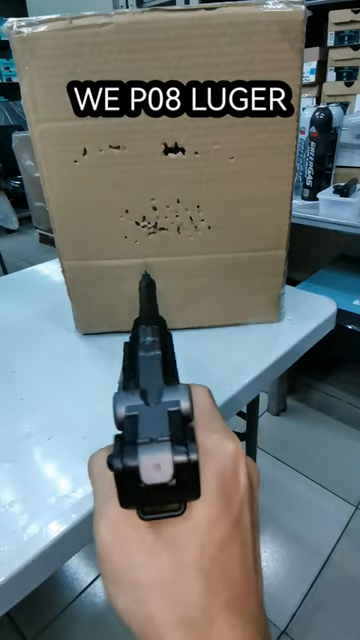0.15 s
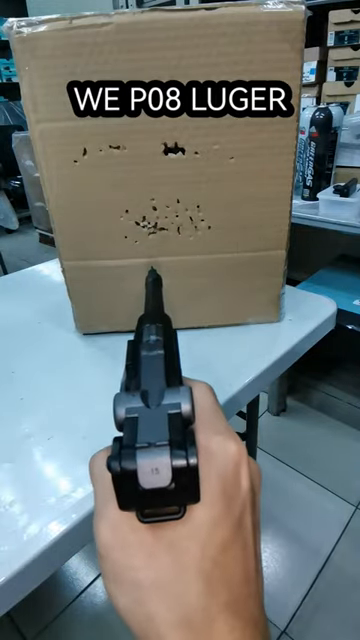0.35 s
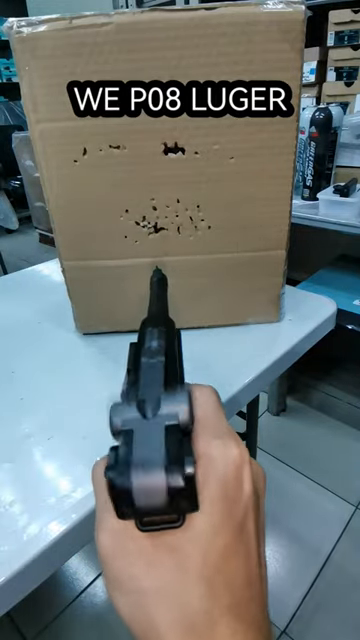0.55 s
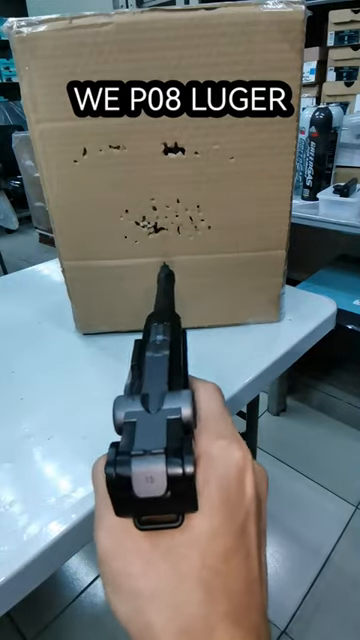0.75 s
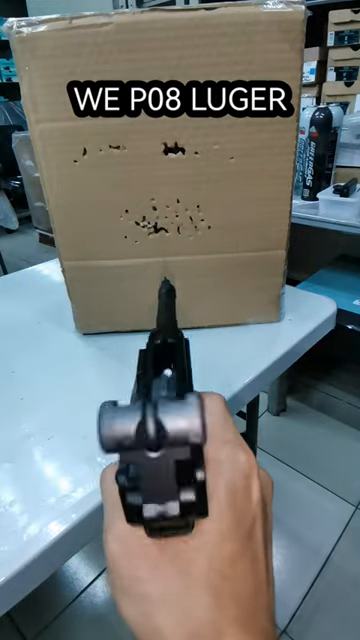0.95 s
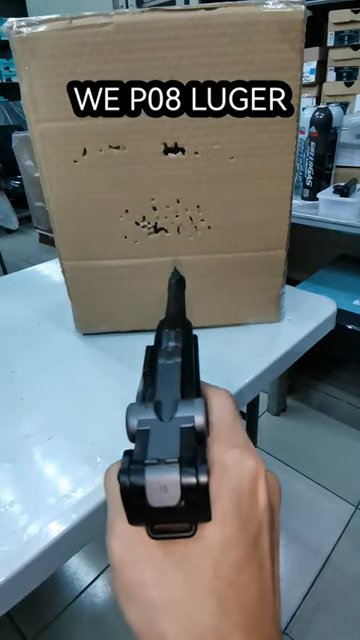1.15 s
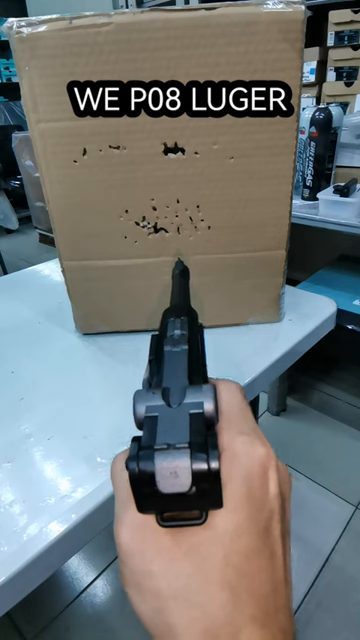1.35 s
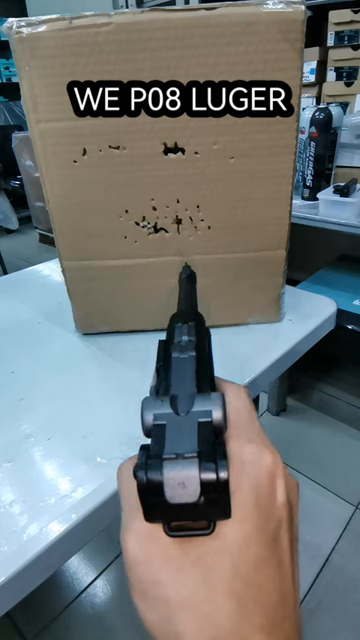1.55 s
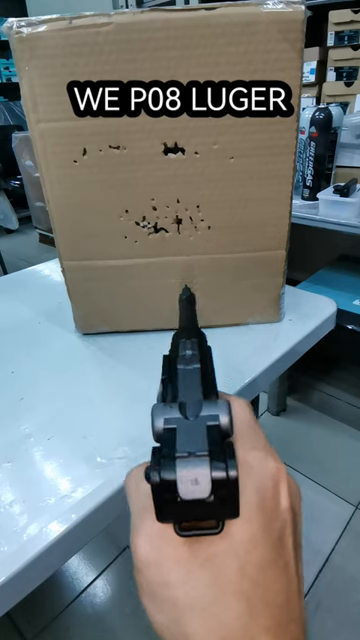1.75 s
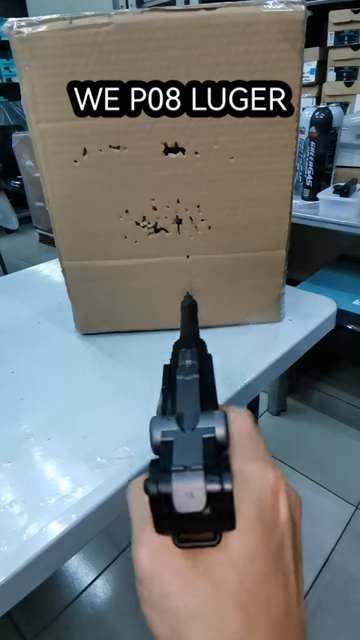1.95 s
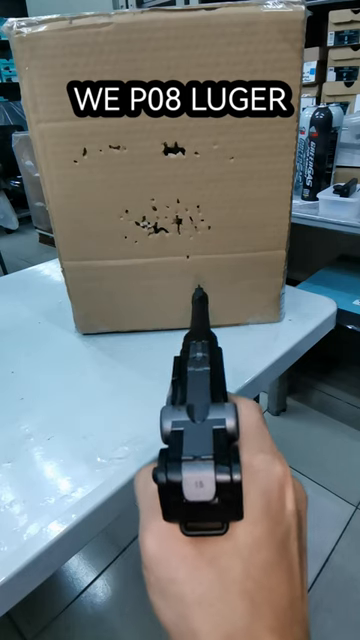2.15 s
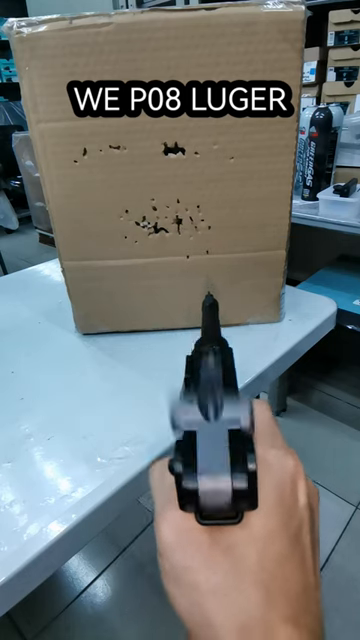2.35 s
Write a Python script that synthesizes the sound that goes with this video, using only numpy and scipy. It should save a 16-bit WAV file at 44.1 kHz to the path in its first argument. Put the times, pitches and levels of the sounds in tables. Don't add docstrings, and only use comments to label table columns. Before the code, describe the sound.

A gas airsoft pistol fires five sharp shots at about 0.2, 0.65, 1.1, 1.5 and 2.0 seconds. Each is a rattling gas crack with ringing steel, a boxy punch through cardboard 15 milliseconds later, then a metal snap shut about 65 milliseconds after the crack. Tiny trigger ticks precede later shots; faint pellet bounces follow the first two. Hard shop echoes; close stereo phone, low ventilation hum ducking and creeping back.

```python
import sys
import numpy as np
from scipy import signal
from scipy.fft import rfft, irfft
from scipy.io import wavfile
from scipy.ndimage import uniform_filter1d

SR = 44100
rng = np.random.default_rng(int(sys.argv[2]) if len(sys.argv) > 2 else 0)


def master(y):
    cut = np.clip(np.atleast_2d(y).T, -1, 1)
    pcm = np.round(cut * 32767)
    wavfile.write(sys.argv[1], SR, pcm.astype(np.int16))


def linear_from_db(decibels):
    return 10 ** (np.asarray(decibels, float) / 20)


N = 103635
PORT_LAG_S = .00014
KNOCK_T60_S, KNOCK_TURNS = 0.011, 3.8

# [t/s, peak level/dB, steel ring f/Hz, left-right/dB]
SHOTS = [
    (0.207, -12, 4410, 2),
    (0.657, -12.5, 5290, 1.5),
    (1.085, -12.5, 5070, 2.5),
    (1.527, -11.5, 5125, 3),
    (2.023, -14, 5040, 2.5),
]
# [f/Hz, level/dB]
BURST_COLOUR = [(60, -11.5), (250, -7.5), (600, 0), (1500, -3.5), (3500, -3), (4900, 2.5), (6650, -3.5),
                (9400, -8.5), (13000, -7.5), (16000, -21.5)]
# [f/Hz, left-right/dB]
PORT_BALANCE = [(60, -2.5), (290, 3), (640, -1.5), (2500, -2.5), (4800, -4.5), (7800, 5), (9400, 12.5),
                (11500, -2.5)]


def evened(x):
    return x / np.sqrt(np.mean(x ** 2) + 1e-20)


def read(points, hz):
    f, value = np.transpose(points)
    return np.interp(np.log(hz + 1), np.log(f + 1), value)


def add(mix, s, sound):
    part = mix[:, round(s * SR):][:, :sound.shape[1]]
    part += sound[:, :part.shape[1]]


def sides(pan_db):
    return np.array([[.5], [-.5]]) * pan_db


def tint(x, points):
    level_db = read(points, abs(np.fft.fftfreq(4096, 1 / SR)))
    log_gain = np.log(linear_from_db(np.maximum(level_db, -100)))
    taps = np.fft.ifft(np.exp(np.conj(signal.hilbert(log_gain)))).real[:2048]
    return signal.oaconvolve(x, taps[None], axes=1)[:, :x.shape[1]]


def ring(x, modes, scale):
    t = np.arange(4000) / SR
    taps = np.zeros((2, len(t)))
    for f, db, t60 in modes:
        turns = f * scale * t + rng.random((2, 1))
        taps += linear_from_db(db - 60 * t / t60) * np.sin(2 * np.pi * turns)
    return signal.oaconvolve(x, taps, axes=1)[:, :x.shape[1]]


def rattle(rise_s, hold_s, t60, spread_db, same):
    t = np.arange(0, .12, 1 / SR)
    fall = linear_from_db(-60 * np.maximum(t - rise_s - hold_s, 0) / t60)
    shape = np.minimum(t / rise_s, 1) ** 2 * fall
    lumps = linear_from_db(spread_db * evened(uniform_filter1d(rng.standard_normal(len(t)), size=30)))
    left, other = rng.standard_normal((len(t), 2)).T
    right = np.roll(same * left + np.sqrt(1 - same ** 2) * other, round(PORT_LAG_S * SR))
    return np.array([left, right]) * lumps * shape


def clank(drive, colour, ring_hz, ring_db, db, pan_db):
    # [multiple of the ring pitch, level/dB, t60/s]
    steel_modes = [(.46, -10, .03), (.63, -9, .03), (.76, -8, .03), (.92, -4, .025), (.98, 0, .028),
                   (1.04, -1, .025), (1.1, -5, .025)]
    ringing = evened(ring(drive, steel_modes, ring_hz))
    mixed = evened(tint(drive, colour)) + linear_from_db(ring_db) * ringing
    peak = np.sqrt(uniform_filter1d((mixed ** 2).mean(0), size=180).max())
    return mixed / peak * linear_from_db(db + sides(pan_db))


def shop():
    # [f/Hz, level/dB]
    hum_colour = [(30, 0), (70, -12), (140, -4), (300, -3.5), (2540, -4.5), (5500, -15.5), (9000, -31.5),
                  (15000, -31)]
    # [f/Hz, likeness]
    hum_likeness = [(60, 0.67), (380, 0.64), (2380, -0.19), (15000, 0.36)]
    frames, hz = N // 256 + 5, np.fft.rfftfreq(1024, 1 / SR)
    a, b, c, d, patches = rng.standard_normal((frames, 513, 5)).T
    patches = uniform_filter1d(patches, size=8, axis=0)
    patches = evened(uniform_filter1d(patches, size=8, axis=1))
    same = np.clip(read(hum_likeness, hz), -1, 1)[:, None]
    left = a + 1j * b
    right = same * left + np.sqrt(1 - same ** 2) * (c + 1j * d)
    z = np.array([left, right]) * linear_from_db(read(hum_colour, hz)[:, None] + 1.46 * patches)
    wash = signal.istft(z, nperseg=1024, noverlap=768)[1][:, :N]
    return linear_from_db(-52.5) * evened(wash)


def motors():
    # [f/Hz, level/dB]
    motor_lines = [(145.3, -74.5), (358, -93), (506, -81), (651.4, -79), (1394, -77)]
    out = np.zeros(N)
    for f, db in motor_lines:
        waver = evened(uniform_filter1d(rng.standard_normal((N, 2)), size=5000, axis=0)).T
        turns = np.cumsum(f + 1.26 * waver[1]) / SR
        out += linear_from_db(db + 9.0 + 2.0 * waver[0]) * np.sin(2 * np.pi * turns)
    return out


def ducking(depth_db, back_s):
    t, down_db = np.arange(N) / SR, np.zeros(N)
    for s, *_ in SHOTS:
        creep = np.exp(-np.maximum(t - s - .1, 0) / back_s)
        down_db = np.maximum(down_db, (t > s) * depth_db * creep)
    return linear_from_db(-uniform_filter1d(down_db, size=400))


def background():
    hum = shop()
    low = signal.sosfilt(signal.butter(2, 400, fs=SR, output="sos"), hum)
    ducked_low = low * (ducking(25.5, 0.21) + 0.14)
    ducked_high = (hum - low) * ducking(16.4, 0.29)
    return ducked_low + ducked_high + motors() * ducking(21.6, 0.16)


def gas_burst(db, ring_hz, pan_db):
    return clank(rattle(0.0024, 0.012, 0.069, 1.5, 0.083), BURST_COLOUR, ring_hz, -7.0, db - 7.0, pan_db)


def hammer_crack(db, ring_hz, pan_db):
    # [f/Hz, level/dB]
    crack_colour = [(100, -2), (500, -5.5), (1500, 1.5), (3000, 4.5), (4800, 1.5), (7000, -12),
                    (11500, -12), (16000, -51)]
    return clank(rattle(0.00055, 0.0045, 0.019, 1.14, 0.62), crack_colour, ring_hz, -4.0, db - 5., pan_db)


def knock(db, hz, pan_db, t60):
    rise_s = 0.00064
    t = np.arange(0, .08, 1 / SR) - np.array([[0], [PORT_LAG_S]])
    shape = np.clip(t / rise_s, 0, 1) ** 2 * linear_from_db(-60 * np.maximum(t - rise_s, 0) / t60)
    first = np.sin(2 * np.pi * (hz * t + rng.random()))
    second = np.sin(2 * np.pi * (hz * rng.uniform(0.869, 1.12) * t + rng.random((2, 1))))
    gain = linear_from_db(db + sides(pan_db - read(PORT_BALANCE, hz)))
    return gain * shape * (first + 0.83 * second)


def room(x, db):
    # [f/Hz, t60/s]
    room_decay = [(100, 0.46), (270, 0.16), (600, 0.33), (1400, 0.45), (3700, 0.48), (5000, 0.53),
                  (9400, 0.46), (13000, 0.44)]
    # [f/Hz, level/dB]
    echo_colour = [(80, -26), (262, -4), (680, -5.5), (2500, -5), (4000, -2), (4930, -0.5), (6000, -4),
                   (9400, -8), (13100, -9), (15500, -28)]
    taps = np.zeros((2, SR))
    at = np.arange(200, SR - 20, 20)
    at = at + rng.integers(0, 20, (2, len(at)))
    np.put_along_axis(taps, at, rng.choice([-1., 1.], at.shape), 1)
    hz, t, z = signal.stft(taps, SR, nperseg=256)
    dying = linear_from_db(-60 * t / read(room_decay, hz)[:, None])
    tail = signal.istft(z * dying, SR, nperseg=256)[1]
    tail = tint(tail, [(f, g - read(BURST_COLOUR, f)) for f, g in echo_colour])
    return linear_from_db(db) * signal.fftconvolve(x, tail / np.linalg.norm(tail[0]), axes=1)[:, :N]


def puff(db, hz):
    turns = np.arange(0, 5.2 / hz, 1 / SR) * hz
    shape = np.minimum(turns * 1.77, 1) * linear_from_db(-14. * turns)
    return linear_from_db(db) * np.array([[1.], [-.25]]) * np.sin(2 * np.pi * turns) * shape


def punch(db):
    # [f/Hz, level/dB, t60/s]
    panel_modes = [(272.4, -15.5, 0.18), (534.4, -7, 0.047), (928, -10, 0.012), (1200, -29, 0.0062)]
    t = np.arange(0, .2, 1 / SR)
    u, late = (t - .0005) / .0006, (t - .0017) / .0007
    pulse = np.where(u > 0, -np.exp(-u ** 2), .65 * t / .0005)
    pulse = pulse + .7 * (late > 0) * np.exp(-np.abs(late))
    panel = np.zeros(len(t))
    for f, g, t60 in panel_modes:
        panel -= linear_from_db(g - 60 * t / t60) * np.sin(2 * np.pi * f * rng.uniform(0.97, 1.015) * t)
    pulse = signal.lfilter(*signal.butter(1, 120, "high", fs=SR), uniform_filter1d(pulse, size=5))
    return linear_from_db(db - 5.5 + np.array([[-2.5], [1.5]])) * (pulse + linear_from_db(-8.0) * panel)


def toggle_slam(db, ring_hz):
    # [f/Hz, level/dB]
    slam_colour = [(100, -9.5), (516, -2.5), (873, -1.5), (4680, 0), (6500, -4.5), (7600, -6),
                   (12100, -10.5), (16000, -26)]
    return clank(rattle(0.0036, 0.0016, 0.089, 1.7, 0.3), slam_colour, ring_hz, -11.0, db + 7.0, 0)


def toggle_shut(mix, s, db, ring_hz, pan_db):
    # [f/Hz, level/dB]
    snap_colour = [(100, -10.5), (570, -6), (4340, 2.5), (8000, -8.5), (9450, -2), (10700, -6.5),
                   (13800, -8), (16000, -22)]
    snap = rattle(0.00092, 0.004, 0.036, 3.0, 0.38)
    add(mix, s - .0005, clank(snap, snap_colour, ring_hz, -25.0, db - 2.5, pan_db))
    scrape = rattle(0.03, 0.00103, 0.024, 1.8, 0.57)
    add(mix, s - .03, clank(scrape, snap_colour, ring_hz, -42.0, db - 11., 0))


def thud(db):
    return linear_from_db(db) * np.array([[1.], [.1]]) * np.hanning(round(0.0038 * SR))


def bounce(db):
    colour = [(1500, -25), (3500, 0), (10000, -1), (14000, -10)]
    return clank(rattle(.0004, .001, 0.026, 3.6, 0.13), colour, 4760, -30, db, 0)


def tick(db, hz, length_s, bright_db):
    thin_colour = [(1500, -6), (9500, 0), (13500, -6), (15000, -50)]
    thin = clank(rattle(.0003, .0004, .006, 2, .7), thin_colour, 4800, -40, db + bright_db + 8., 0)
    buzz_colour = [(hz / 3, -18), (hz, 0), (hz * 3.1, -12), (6500, bright_db - 6.0),
                   (9500, bright_db - 1.5), (13500, bright_db - 7.5), (15000, -60)]
    buzz = clank(rattle(.0006, length_s, .012, 3., .7), buzz_colour, hz, -28.0, db - 1.5, 0)
    spring = knock(db + 1.5, hz, 0, 0.015 + 2 * length_s)[:, :buzz.shape[1]]
    add(buzz, 0, spring)
    return thin + buzz


def scene():
    # [t/s, peak level/dB]
    cracks = [
        (0.2057, -10),
        (.6565, -16.5),
        (1.0854, -13),
        (1.528, -11.5),
        (2.0218, -11.5),
    ]
    # [t/s, peak level/dB]
    hits = [
        (0.2223, -5.5),
        (0.6711, -5.5),
        (1.101, -6),
        (1.5433, -4.5),
        (2.0381, -8),
    ]
    # [t/s, peak level/dB]
    backs = [
        (0.2311, -35),
        (0.6779, -31.5),
        (1.1075, -32),
        (1.5488, -33),
        (2.0455, -33.5),
    ]
    # [t/s, peak level/dB, left-right/dB]
    shuts = [
        (0.271, -23.5, 2.5),
        (0.717, -24, 7),
        (1.1503, -23, 3.5),
        (1.5934, -25.5, 6.5),
        (2.087, -23, 4),
    ]
    # [t/s, peak level/dB, ring f/Hz, left-right/dB]
    knocks = [(0.2074, -9, 4380, -12.5), (0.2092, -15.5, 1090, -1), (0.2116, -19.5, 1200, -4),
              (0.2131, -17, 5150, -18), (0.2156, -28, 4400, -3), (0.2177, -29, 5120, 0),
              (0.229, -29, 7410, 14), (0.2486, -25, 4740, 0), (0.2715, -28, 4020, -4),
              (0.2769, -22, 2780, -5), (0.6579, -19.5, 5160, -8), (0.659, -26, 820, -8),
              (0.6619, -20, 578, 0), (0.6621, -26, 5150, -4), (0.6648, -17, 4520, -9),
              (0.669, -19, 4800, -3), (0.6772, -28, 6860, 3), (0.691, -31, 4810, -2),
              (0.7182, -25, 3450, -7), (0.7227, -31, 2350, -16), (1.0855, -20, 5200, -10),
              (1.0873, -17, 1160, 0), (1.0901, -24, 746, -2), (1.092, -16, 4770, -9),
              (1.0945, -17.5, 5030, -4), (1.0968, -32, 5000, -4), (1.1079, -23.5, 8400, 13),
              (1.1209, -38, 5060, -6), (1.1505, -20.5, 4810, 2), (1.1526, -30, 4650, 1),
              (1.5256, -30, 3170, -2), (1.527, -15, 5070, 6), (1.5292, -17, 5140, -9),
              (1.5295, -13.5, 1525, -1.5), (1.5333, -14.5, 4820, -11), (1.5362, -18, 5000, -2),
              (1.5523, -20, 7230, 11), (1.559, -31, 5270, -1.5), (1.5946, -27, 2110, -3),
              (1.596, -28, 4410, 1), (2.0237, -14.5, 2670, -8), (2.024, -7, 4760, -5),
              (2.0277, -23.5, 676, -1), (2.029, -21, 5300, -5), (2.031, -29, 5100, -1),
              (2.035, -17, 4800, -6), (2.0515, -34, 7100, 12), (2.0736, -24, 5170, -4),
              (2.0878, -33.5, 2220, 4), (2.092, -33, 4960, -3)]
    # [t/s, level/dB, f/Hz]
    puffs = [
        (0.2102, -6.5, 166),
        (0.656, -22.5, 62),
        (1.084, -25, 62),
        (1.524, -18.5, 68),
        (2.024, -29, 109),
    ]
    # [t/s, peak level/dB]
    bounces = [
        (0.3714, -43.5),
        (0.8028, -41.5),
    ]
    # [t/s, peak level/dB, spring f/Hz, length/s, brightness/dB]
    ticks = [
        (0.614, -53.5, 2500, .003, -15.5),
        (0.624, -53.5, 1500, .006, -20),
        (1.0583, -44, 3310, 0.0033, -27),
        (1.064, -46.5, 1430, .006, -28),
        (1.075, -50, 1390, 0.0023, -21),
        (1.496, -45.5, 1540, 0.012, -19.5),
        (1.5155, -43.5, 1510, 0.0086, -57),
        (1.994, -49, 2560, 0.0054, -18),
        (2.0017, -43, 1620, 0.0025, -21),
        (2.0107, -34.5, 1527, .006, -20.5),
    ]
    # [t/s, level/dB, f/Hz]
    springs = [
        (2.087, -34, 2165),
        (2.158, -45.5, 2210),
    ]

    gun, small, near, steel = np.zeros((4, 2, N))
    for shot, crack, hit, back, shut in zip(SHOTS, cracks, hits, backs, shuts):
        s, db, hz, pan = shot
        add(gun, s - .003, gas_burst(db, hz, pan))
        add(gun, crack[0], hammer_crack(crack[1], hz, pan))
        add(gun, hit[0] - .0004, punch(hit[1]))
        add(gun, back[0] - .001, toggle_slam(back[1], hz))
        toggle_shut(gun, shut[0], shut[1], hz, shut[2])
        add(near, shut[0], thud(shut[1] - 9.))
    for s, db, hz, pan in knocks:
        add(steel, s, knock(db - .8, hz, pan, KNOCK_T60_S + KNOCK_TURNS / hz))
    for s, db, hz in puffs:
        add(near, s, puff(db, hz))
    for s, db in bounces:
        add(small, s, bounce(db))
    for s, db, hz, length_s, bright_db in ticks:
        add(small, s, tick(db, hz, length_s, bright_db))
    for s, db, hz in springs:
        add(small, s, knock(db, hz, -1.0, 0.051))
    echoes = room(gun + small + linear_from_db(-4.5) * steel, -12.5)
    return gun + small + near + steel + echoes + background()


def low_pass(x):
    return signal.sosfilt(signal.butter(12, 16650, fs=SR, output="sos"), x)


def record(dry):
    limit, edge_hz, gate_hz = .9, 15200, 9500
    hz = np.fft.rfftfreq(N, 1 / SR)
    colour = linear_from_db(sides(read(PORT_BALANCE, hz))) / np.sqrt(1 + (hz / edge_hz) ** 70)
    limited = limit * np.tanh(dry / limit)
    f, t, z = signal.stft(irfft(rfft(limited) * colour, N), SR, nperseg=1024)
    band = np.sqrt(abs(uniform_filter1d(abs(z) ** 2, size=5, axis=1)))
    ragged = uniform_filter1d(rng.standard_normal((len(t), len(f))), size=4, axis=0)
    ragged = evened(uniform_filter1d(ragged, size=10, axis=1)).T
    gate_db = -111 + 1.6 * (f - gate_hz)[:, None] / 1000 + 5.8 * ragged + 7 * (f > 15700)[:, None]
    gate = linear_from_db(gate_db) * (f > gate_hz)[:, None]
    opened = np.clip(band / (gate + 1e-12), 0, 1) ** 6
    mix = signal.istft(z * opened, SR, nperseg=1024)[1][:, :N]
    return low_pass(mix)


dry = scene()
out = record(dry)
master(out)
```